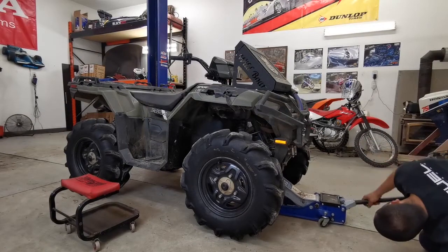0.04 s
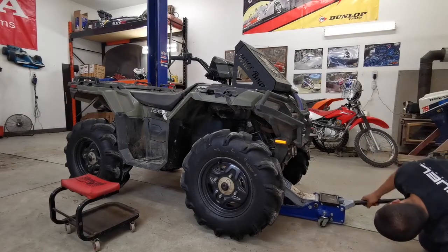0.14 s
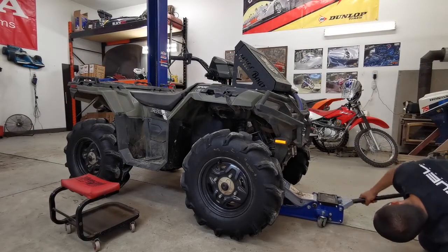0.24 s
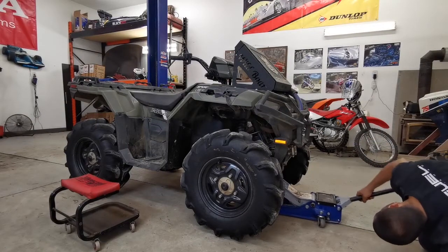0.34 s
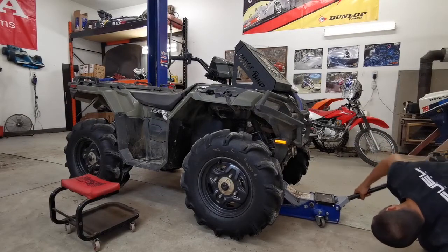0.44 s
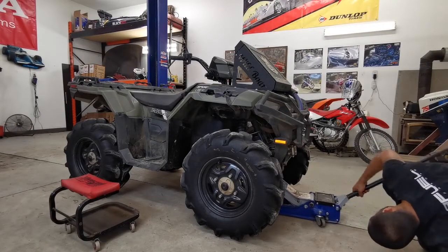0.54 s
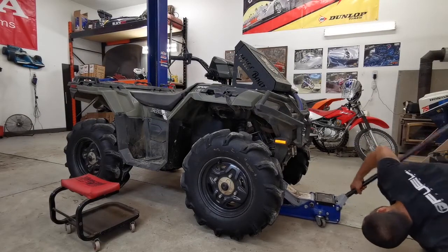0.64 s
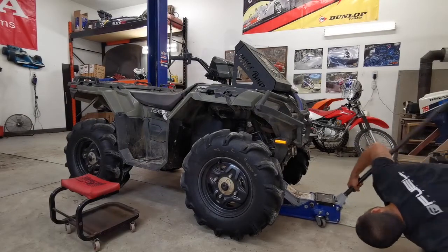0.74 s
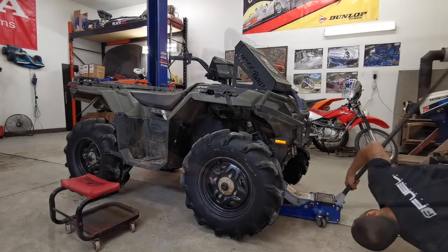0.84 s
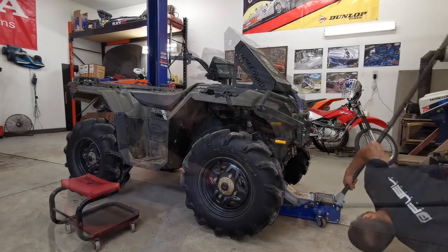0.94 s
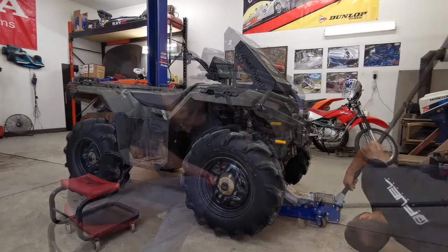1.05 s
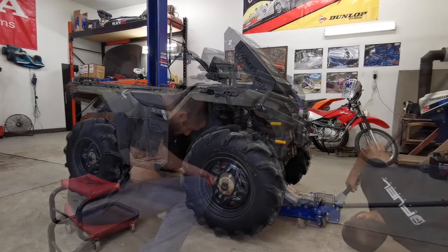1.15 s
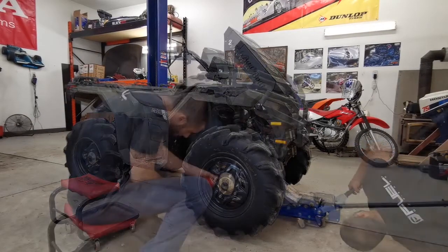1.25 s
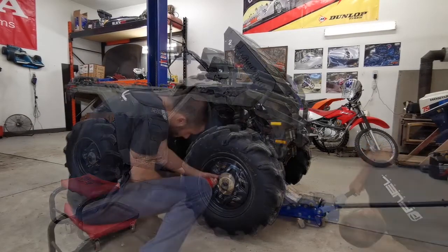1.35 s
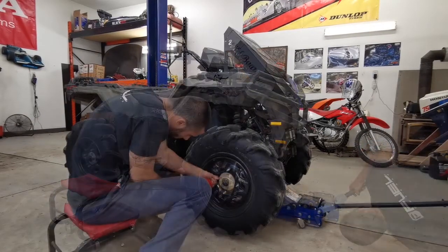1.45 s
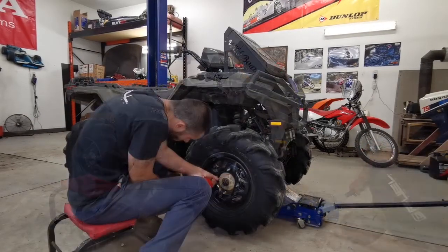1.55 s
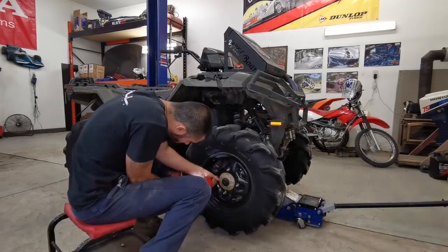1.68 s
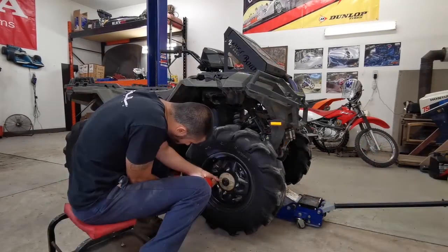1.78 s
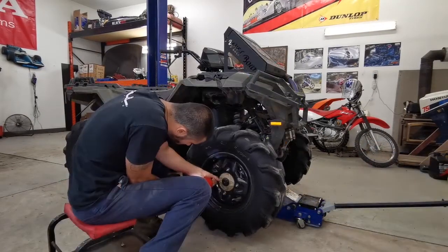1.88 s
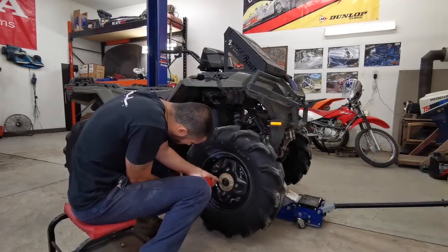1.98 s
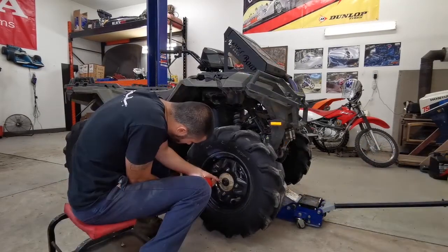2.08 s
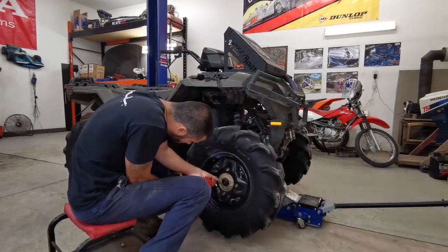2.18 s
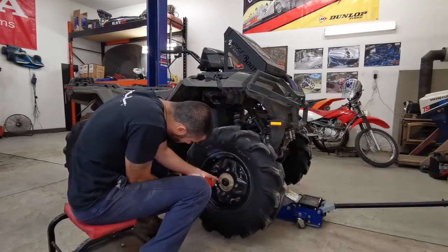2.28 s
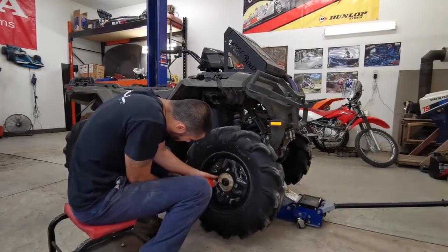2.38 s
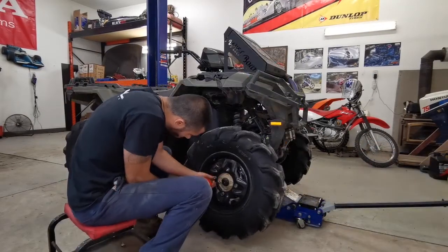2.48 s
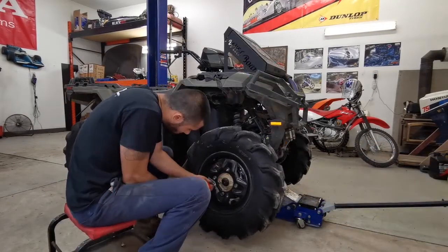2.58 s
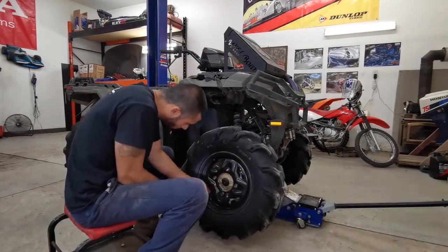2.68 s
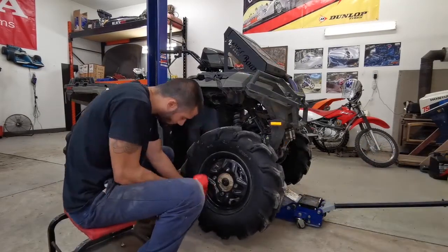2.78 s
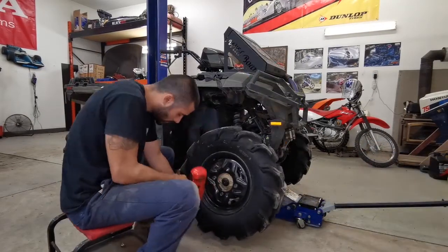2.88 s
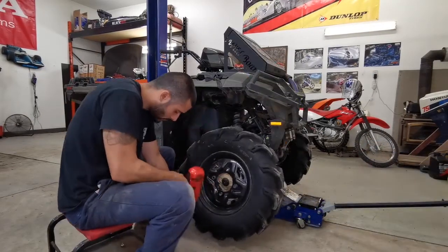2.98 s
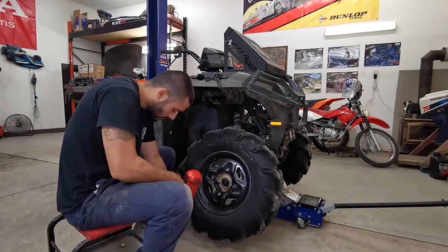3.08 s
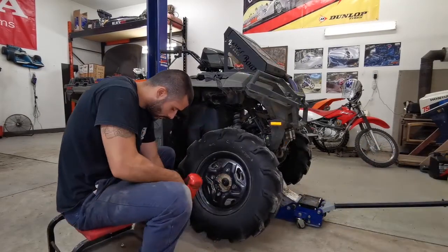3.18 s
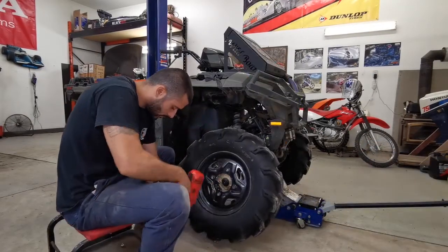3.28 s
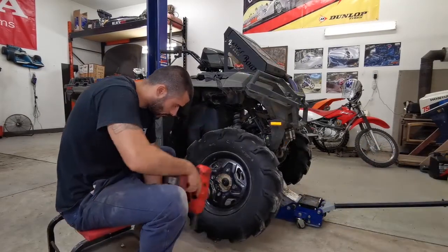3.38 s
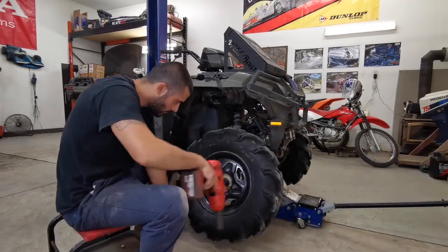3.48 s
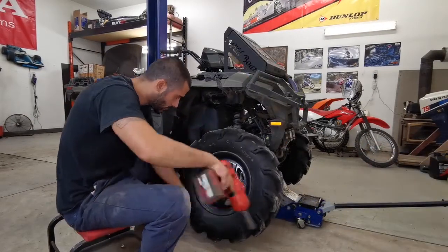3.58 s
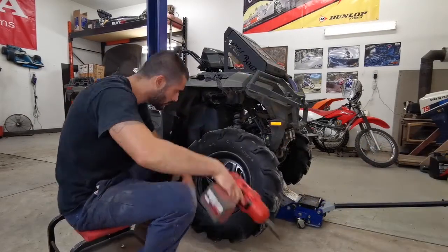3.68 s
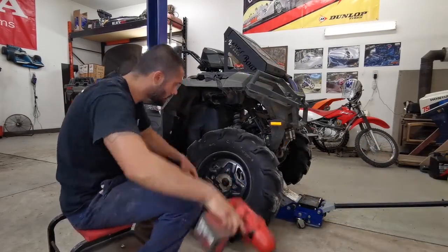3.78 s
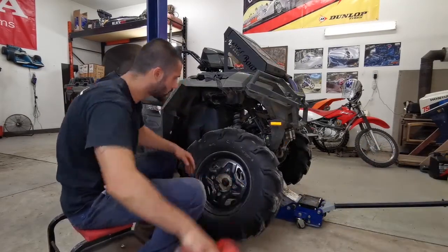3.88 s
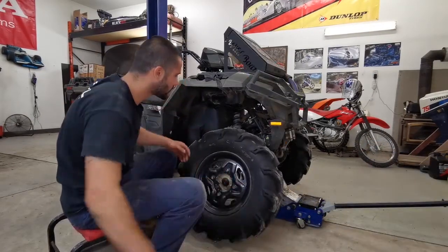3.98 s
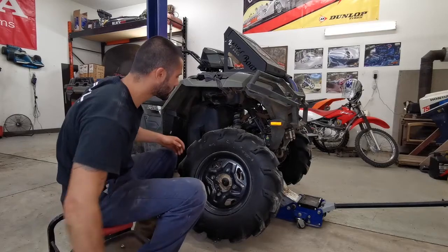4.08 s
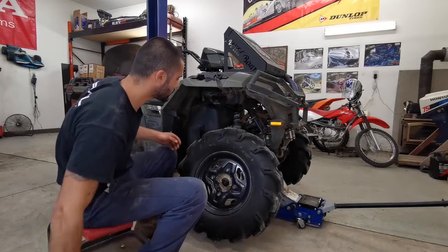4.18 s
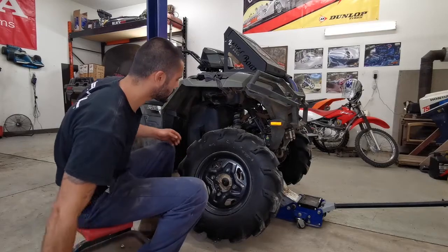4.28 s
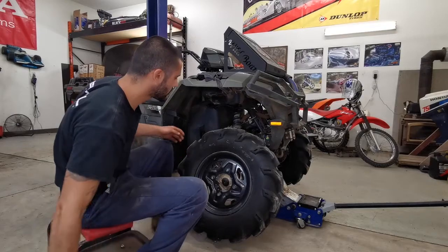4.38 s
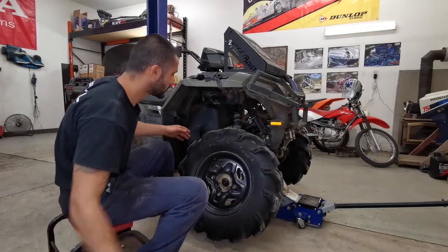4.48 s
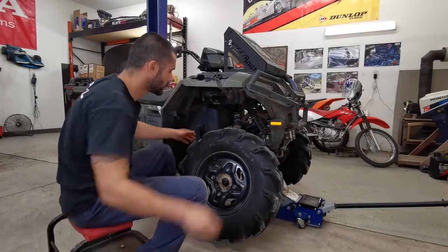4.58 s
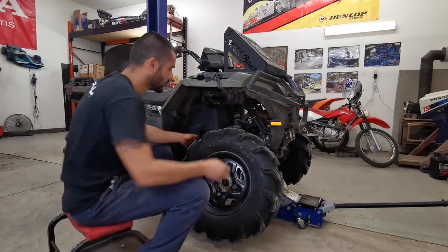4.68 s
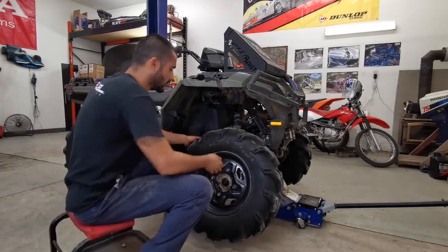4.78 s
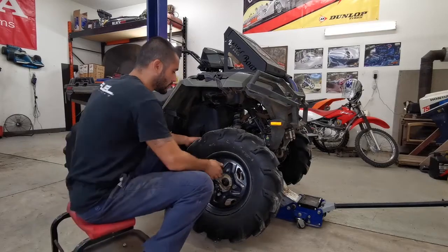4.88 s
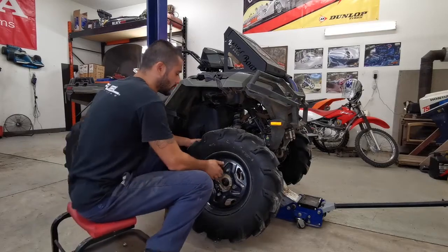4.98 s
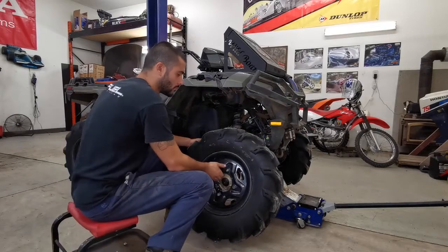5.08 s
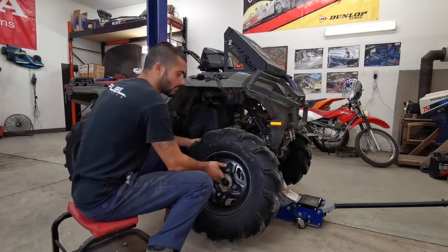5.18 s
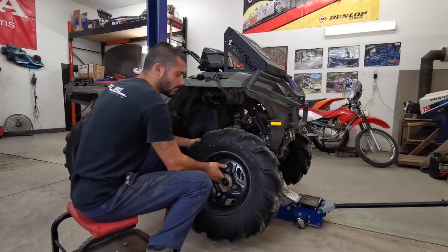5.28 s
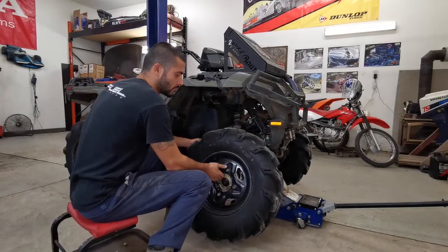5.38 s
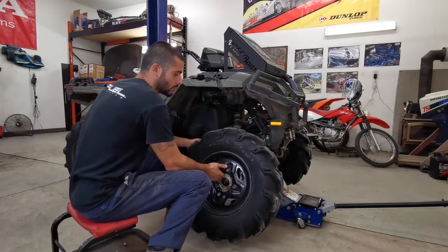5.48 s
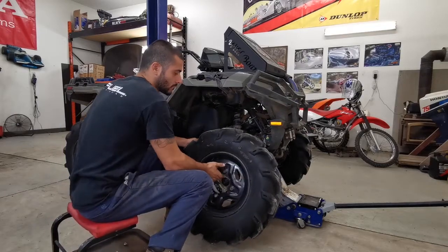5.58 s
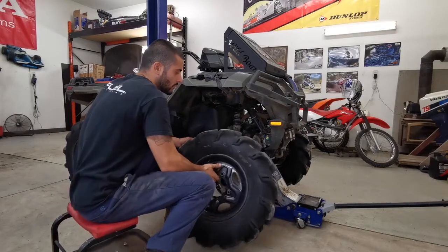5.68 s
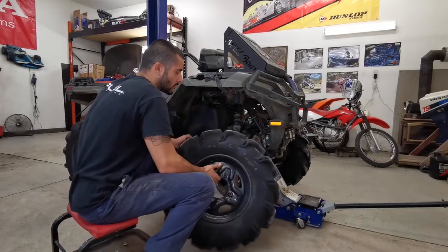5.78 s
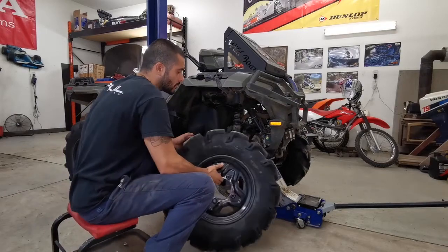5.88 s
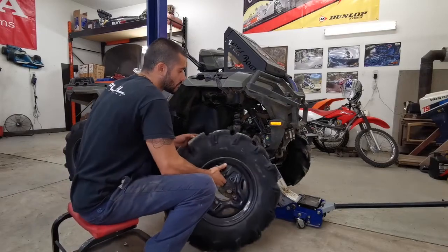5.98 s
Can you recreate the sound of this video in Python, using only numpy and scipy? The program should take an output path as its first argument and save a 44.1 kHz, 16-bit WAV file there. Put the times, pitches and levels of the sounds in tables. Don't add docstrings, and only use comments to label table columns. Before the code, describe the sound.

In an echoing garage, a jack clanks and squeaks, then an impact wrench hammers and whines a nut loose before a wheel thuds off.

```python
import sys
import numpy as np
from scipy import signal
from scipy.io import wavfile
from scipy.ndimage import uniform_filter1d

SR = 44100
rng = np.random.default_rng(int(sys.argv[2]) if len(sys.argv) > 2 else 0)


def put_to_file(sound):
    columns = np.atleast_2d(sound).T
    safe = np.clip(columns, -1, 1)
    whole_steps = np.round(safe * 32767)
    wavfile.write(sys.argv[1], SR, whole_steps.astype(np.int16))


def voltage_ratio(level):
    return 10 ** (np.asarray(level, float) / 20)


N = 266584


def evened(x):
    return x / np.sqrt(np.mean(x ** 2) + 1e-20)


def read(points, hz):
    f, value = np.transpose(points)
    return np.interp(np.log(hz + 1), np.log(f + 1), value)


def coloured(x, points):
    hz = abs(np.fft.fftfreq(4096, 1 / SR))
    level = np.log(voltage_ratio(np.maximum(read(points, hz), -90)))
    taps = np.fft.ifft(np.exp(level - 1j * signal.hilbert(level).imag)).real[:2048]
    return signal.oaconvolve(x, taps / np.linalg.norm(taps))[:len(x)]


def resonate(x, hz, width):
    turn = np.exp(2j * np.pi * np.cumsum(hz * np.ones(len(x))) / SR)
    r = np.exp(-np.pi * width / SR)
    return 2 * (turn * signal.lfilter([1 - r], [1, -r], x / turn)).real


def spread(rows):
    s, *columns = np.transpose(rows)
    t = np.arange(N) / SR
    gate = np.interp(t, [s[0], s[0] + .03, s[-1] - .015, s[-1]], [0, 1, 1, 0])
    return gate, *(np.interp(t, s, c) for c in columns)


def stroke(start, length, first_db, last_db):
    gate, db = spread([(start, first_db), (start + length, last_db)])
    return gate * voltage_ratio(db)


def bumps(rows):
    t = np.arange(N) / SR
    return sum(height * np.exp(-((t - s) / half) ** 2) for s, half, height in rows)


# [f/Hz, correlation]
PORT_LIKENESS = [(60, 0.94), (180, 0.97), (550, 0.55), (1650, 0.018), (4970, 0.035), (15000, 0.018)]


def ports(frames, size):
    hz = np.fft.rfftfreq(size, 1 / SR)
    a, b, c, d = rng.standard_normal((frames, len(hz), 4)).T
    same = np.clip(read(PORT_LIKENESS, hz), -1, 1)[:, None]
    left = a + 1j * b
    right = same * left + np.sqrt(1 - same ** 2) * (c + 1j * d)
    return hz, np.array([left, right])


def heard(x, pan_db, echo_db, send=None, path=0):
    out = np.zeros((5, len(x)))
    lagged = np.roll(x, 14)
    out[:2] = np.array([x, lagged]) * voltage_ratio([[pan_db / 2], [-pan_db / 2]])
    out[2 + path % 3] = (x if send is None else send) * voltage_ratio(echo_db)
    return out


def knocks(rows, colour, ring=(), ring_db=0, blow_db=0, pan_db=-3.5, bright_db=1.1):
    out, t = np.zeros((5, N)), np.arange(SR // 2) / SR
    click = coloured(1. * (t == 0), colour)
    aimed = [(hz, level + bright_db * np.log2(hz / 3000)) for hz, level in colour]
    ringing = [voltage_ratio(ring_db + mode_db - 60 * t / t60) * np.exp(2j * np.pi * hz * t)
               for hz, mode_db, t60 in ring]
    ringing = np.reshape(ringing, (len(ring), len(t)))
    burst_len = SR // 8
    for k, (s, db, echo_db, ms) in enumerate(rows):
        u = t / (ms / 1000)
        bursts = [coloured((n * u * np.exp(-2 * u))[:burst_len], aimed)
                  for n in rng.standard_normal((2, len(t)))]
        shared, own = np.pad(bursts, ((0, 0), (0, len(t) - burst_len)))
        scale = 1 / abs(shared).max()
        phases = np.exp(2j * np.pi * rng.random(len(ring)))
        modes = (phases @ ringing).imag * np.tanh(u)
        send = click * np.linalg.norm(scale * shared) + modes
        sound = heard(scale * shared + modes, pan_db, echo_db, send, path=k)
        sound[0] += .8 * scale * own * voltage_ratio(pan_db / 2)
        part = out[:, round(s * SR):][:, :len(t)]
        part += voltage_ratio(db + blow_db) * sound[:, :part.shape[1]]
    return out


# [f/Hz, density/dB per Hz]
HUM_COLOUR = [(12, -25.5), (20, -9.5), (91, -10.5), (157, -6), (240, -3), (271, -13), (359, -10.5),
              (584, -11.5), (633, -11), (1050, -16), (2500, -21.5), (3250, -40.5), (5500, -120)]
HISS_COLOUR = [(1180, -85), (2000, 0.5), (2720, -1), (3600, -4), (4550, -3), (5100, -6.5), (8330, -17),
               (10700, -14), (11900, -22), (15100, -26.5), (16200, -36)]


def patchy_noise(points, level_db, patchy_db):
    hz, z = ports(N // 512 + 5, 2048)
    patches = uniform_filter1d(rng.standard_normal(z.shape[1:]), 12, 0)
    patches = evened(uniform_filter1d(patches, 8, 1))
    z = z * voltage_ratio(read(points, hz)[:, None] + patchy_db * patches)
    return voltage_ratio(level_db) * evened(signal.istft(z, nperseg=2048, noverlap=1536)[1][:, :N])


def hum():
    return patchy_noise(HUM_COLOUR, -42, patchy_db=1.2) + patchy_noise(HISS_COLOUR, -49.5, patchy_db=.6)


# [f/Hz, level/dB]
DRONE_LINES = [(60, -66.5), (119, -59), (156, -56.5), (235, -85), (315, -53.5), (464, -60.5)]


def drone():
    return sum(voltage_ratio(db) * evened(resonate(rng.standard_normal(N), hz, 11.0)) for hz, db in DRONE_LINES)


LATCH = [
    (0.3185, -17, -10.5, 2.7),
    (.324, -33.5, -15.5, 3.64),
]
LATCH_COLOUR = [(180, -100), (300, -34.5), (452, -11.5), (658, -36.5), (1060, 7), (1270, -14), (1910, 0),
                (2560, -6.5), (4320, 2.5), (7670, -28.5), (8600, -27), (15000, -43.5)]
LATCH_RING = [(465, -3, .22), (960, -5, .1), (1060, -6, .08), (1730, 3, .1), (1900, -2, .15)]


def latch():
    return knocks(LATCH, LATCH_COLOUR, LATCH_RING, ring_db=-19.5, pan_db=8.5)


# [f/Hz, t60/s]
GARAGE_T60 = [(100, 0.58), (250, 0.93), (660, 1.215), (1740, 1.36), (4590, 1.363), (10500, 0.82),
              (13000, 0.95), (16000, 0.9) ]


def garage(x):
    hz, z = ports(2 * SR // 128, 512)
    t = np.arange(z.shape[2]) * 128 / SR
    decay = voltage_ratio(-60 * t / read(GARAGE_T60, hz)[:, None])
    tail = signal.istft(z * decay, nperseg=512, noverlap=384)[1]
    t = np.arange(tail.shape[1]) / SR
    tail = tail * np.clip((t - .003) / .006, 0, 1)
    tail = tail / np.sqrt(np.mean(tail[:, :SR // 10] ** 2)) / 8
    return signal.fftconvolve(x[None], tail, axes=1)[:, :N]


JACK = [
    (.389, -16.5, -6.5, 14.4),
    (.395, -13, -14, 1.2),
    (.408, -18, -28, 5.5),
    (.44, -35, -6, 2.3),
]
JACK_COLOUR = [(120, -27), (200, -47), (300, -39), (467, -5), (650, -10), (950, -5.5), (1460, -4),
               (1780, -3.5), (2450, -2.5), (3300, -10), (4810, -7.5), (7800, -22.5), (10800, -25),
               (15000, -49.5)]
JACK_RING = [(236.5, -14, 1), (472, -0.5, 0.1), (601, -3.5, 0.24), (942, 1, 0.072), (1152, -0.5, 0.12),
             (1461, 1, 0.29), (1826, -0.5, 0.21), (1805, -4, 0.32), (2000, -10, .3), (2363, -7, 0.33),
             (1850, -9, .3), (2503, -10, 0.28), (4254, -10.5, 0.52), (4760, -3, 0.2)]


def jack():
    return knocks(JACK, JACK_COLOUR, JACK_RING, ring_db=-19.5, pan_db=16.0, bright_db=0.0)


# [t/s, length/s, first level/dB, last level/dB, f/Hz]
SQUEAKS = [
    (.69, .2, -36, -42, 2362),
    (.72, .15, -41, -46, 1812),
    (.62, .1, -42, -44, 1437),
    (.6, .08, -39, -42, 1790),
]


def squeak():
    tones = sum(stroke(*row) * evened(resonate(rng.standard_normal(N), hz, 6)) for *row, hz in SQUEAKS)
    return heard(tones, 0.47, -35.5)


FITTING = [
    (1.355, -33.5, -10, 2.6),
    (1.371, -36, -30, 1.7),
    (1.377, -26, -17, 3.3),
    (1.478, -26, -16, 5.5),
    (1.5145, -31, -18, 3.7),
]
FITTING_COLOUR = [(180, -14), (300, -11), (490, -19), (726, -4.5), (801, -13), (943, -8), (1310, -9),
                  (2690, -0.5), (3440, -11), (4390, -9.5), (8320, -27), (10800, -26), (15000, -82)]
RIM_RING = [(710, -3, 0.13), (2590, -0.5, .3), (2700, 2, 0.31)]


def fitting():
    return knocks(FITTING, FITTING_COLOUR, RIM_RING, ring_db=-27.5, blow_db=7.5)


DRAGS = [
    (1.465, 0.27, -40, -51),
    (2.754, 0.14, -40.5, -33.5),
    (3.23, 0.089, -37, -35),
    (4.9, 0.096, -49, -49),
    (5.764, 0.214, -32.5, -48),
]
DRAG_COLOUR = [(29, -55), (50, -42), (100, -8), (222, -4), (367, -18), (455, -34), (479, -25), (651, -22),
               (1200, -55), (1560, -55), (2640, -120)]


def drags():
    lumps = voltage_ratio(2.2 * evened(uniform_filter1d(rng.standard_normal(N), 500)))
    judder = evened(coloured(rng.standard_normal(N) * lumps, DRAG_COLOUR))
    return heard(judder * sum(stroke(*row) for row in DRAGS), 0.055, -61.5)


RIM_KNOCK = [
    (1.478, -30, -30, 6),
    (1.498, -33, -30, 8),
    (1.585, -38, -30, 8),
    (1.52, -36, -30, 6),
]
RIM_KNOCK_COLOUR = [(80, -31), (200, 1), (330, -11.5), (720, -5), (1200, -17.5), (4000, -40.5)]
RIM_KNOCK_RING = [(716, -2.5, 0.26), (207, -1, 0.27)]


def rim_knock():
    return knocks(RIM_KNOCK, RIM_KNOCK_COLOUR, RIM_KNOCK_RING, ring_db=-9.5, blow_db=4.0)


TAP = [
    (1.528, -36, -25, 1),
    (3.6615, -22, -25, 1.5),
    (4.0115, -33, -25, 1.5),
]
TICK = [
    (4.4298, -18.5, -14.5, 1.96),
    (4.4544, -43, -12, 1.7),
    (4.4894, -28, -14.5, 1.5),
]
TICK_COLOUR = [(290, -22.5), (500, -11), (678, 9.5), (855, 8), (1300, 6.5), (2690, 8.5), (3020, -2),
               (3390, 8), (7980, -9.5), (10700, -7), (16000, -25)]


def taps_and_ticks():
    return knocks(TAP, TICK_COLOUR) + knocks(TICK, TICK_COLOUR)


TRIGGER = [
    (1.772, -35.5, 6.5, 10),
    (1.7828, -15, -27, 1.6),
    (1.795, -30, 5, 13),
    (1.833, -13, -43, 1.6),
]
TRIGGER_COLOUR = [(290, -42.5), (500, -23), (1000, -1), (1350, 0), (1750, 1), (2500, 1), (3090, -12),
                  (4050, -1), (4470, -7), (9790, -10.5), (15000, -45)]


def trigger():
    return knocks(TRIGGER, TRIGGER_COLOUR, bright_db=-8.5)


HAMMER = [
    -6.5,
    -2.5,
    -4,
    -3,
    -7,
    -4,
]
HAMMER_COLOUR = [(200, -12.5), (500, -15), (795, -8.5), (893, -36), (988, -7), (1280, -34), (1400, -15),
                 (1840, -5), (2730, 2.5), (3110, -0.5), (4600, 8.5), (6300, -3.5), (8210, -7.5), (10700, 1),
                 (12300, -9.5), (14200, -15), (16000, -22.5)]
ANVIL_RING = [(2370, -10.5, 0.5), (2790, -16, 0.5), (3240, -32.5, 0.63), (3540, 7, 0.14), (3950, -24, 0.61),
              (3980, -11.5, 1.7), (4823, -31.5, 10), (6800, -15, 4.3), (6860, -42, 5.0), (8900, -18, 2.8),
              (10170, -8, 1.2), (11200, 17, .03), (10500, 17, .025), (4600, 18, .03), (5900, 14, .02) ]


def hammer():
    first_s, blows_per_s, blow_ms, echo_db = 1.8106, 34.0, 2.3, -24.5
    rebound_s, rebound_db = .0085, -13
    rows = [(first_s + k / blows_per_s, db, echo_db - db, blow_ms) for k, db in enumerate(HAMMER)]
    rows += [(s + rebound_s, db + rebound_db, echo, ms) for s, db, echo, ms in rows]
    return knocks(rows, HAMMER_COLOUR, ANVIL_RING, ring_db=-31.5, blow_db=9.5, pan_db=0.0, bright_db=2.6)


# [t/s, gear mesh f/Hz, drive level/dB]
WHIRR = [
    (1.97, 2564, -32),
    (2.2, 2582, -29),
    (2.255, 2648, -25),
    (2.38, 2640, -22.5),
    (2.52, 2665, -24),
    (2.6, 2698, -23),
    (2.7, 2640, -29),
    (2.8, 2656, -37.5),
    (2.91, 2627, -39),
]
# [multiple, level/dB]
MESH = [(1.5, 4), (2, 11), (2.5, -5), (3, 13), (4, 3), (3.96, -1)]
# [f/Hz, density/dB per Hz]
RUSH_COLOUR = [(290, -23), (500, -20), (1070, -10.5), (1440, -3), (1700, -10.5), (2360, -7), (2710, 0.5),
               (3080, -12), (5260, -3.5), (5720, -12.5), (6680, -6), (8490, -16), (10800, -13.5),
               (12000, -24), (13700, -24), (15500, -28)]
# [middle t/s, half length/s, level/dB]
LEANS = [
    (2.199, 0.027, -41),
    (2.284, 0.019, -48),
    (2.363, 0.051, -39.5),
    (2.523, 0.038, -41.5),
    (2.605, 0.036, -37),
    (2.776, 0.037, -46),
]
# [middle t/s, half length/s, level/dB]
SLACK = [(2.29, .008, -4), (2.345, .008, -5), (2.374, .01, 3), (2.395, .007, -5), (2.43, .015, 2),
         (2.453, .009, -8), (2.541, .009, -13), (2.613, .012, -12), (2.638, .012, 3), (2.683, .012, -12),
         (2.703, .008, 4), (2.716, .004, -5), (2.729, .008, 5), (2.77, .02, -10), (2.803, .007, 4),
         (2.83, .014, -12)]


def whirr():
    gate, hz, drive_db = spread(WHIRR)
    t = np.arange(N) / SR
    let_go_s, engage_s = 2.642, 2.25
    coasting = np.clip((t - let_go_s) / 0.0061, 0, 1)
    throb_db = bumps(SLACK) - 9 * np.clip((engage_s - t) / 0.043, 0, 1)
    wander, swell, chatter = evened(uniform_filter1d(rng.standard_normal((3, N)), 600))
    turns = np.cumsum(hz + 2.5 * wander) / SR
    mesh = np.sin(2 * np.pi * turns) * voltage_ratio(drive_db + throb_db + 6.5 + .8 * swell)
    loose_turns = turns + .025 * chatter
    overtones = sum(voltage_ratio(db) * np.sin(2 * np.pi * k * loose_turns) for k, db in MESH)
    thinning_db = -22 * abs(t - let_go_s + .06)
    mesh += overtones * voltage_ratio(drive_db - 9 + thinning_db + .4 * throb_db + 2 * chatter)
    anvil_tail = voltage_ratio(-28 - 20 * abs(t - WHIRR[0][0]))
    air = voltage_ratio(drive_db + 1 - 5.5 * coasting)
    rush = np.hypot(air, anvil_tail) * coloured(rng.standard_normal(N), RUSH_COLOUR)
    leaning = bumps([(s, half, voltage_ratio(db)) for s, half, db in LEANS])
    housing = voltage_ratio(14) * leaning * evened(resonate(rng.standard_normal(N), 1449, 23))
    whine = heard(gate * mesh, -3, -36)
    return whine + heard(gate * rush, -0.67, -23.5, path=1) + heard(gate * housing, -2.5, -34)


NUT_FREE = [
    (2.605, -16, -15, 2.9),
    (2.613, -16, -19, 2.5),
    (2.623, -17, -20, 3),
]
NUT_FREE_COLOUR = [(240, -37), (400, 0), (928, 9), (1450, 3), (2190, 8), (2590, 5), (3570, 9), (5390, -14),
                   (7000, -9), (8800, -17), (10900, -18), (15500, -40)]


def nut_free():
    return knocks(NUT_FREE, NUT_FREE_COLOUR)


SLIP = [
    (2.879, -16, -46, 4),
    (3.313, -14, -24, 5.5),
    (3.326, -12.5, -33, 2.7),
    (3.3385, -16, -39, 4.8),
    (3.407, -29, -16, 3.6),
]
SLIP_COLOUR = [(60, -16), (150, -8), (600, -2), (1400, -3), (2000, -10), (4500, -20), (7000, -21),
               (15000, -41)]


def slip():
    return knocks(SLIP, SLIP_COLOUR)


SOCKET = [
    (2.9066, -6, -16, 1.2),
    (2.915, -17, -27, 0.6),
]
SOCKET_COLOUR = [(240, -22), (400, -38), (650, -26), (1180, -5.5), (1720, -13.5), (2380, 1), (2910, -7.5),
                 (6040, -3), (7800, -7.5), (9200, -5), (10600, -0.5), (12300, -15), (15500, -13),
                 (16300, -16)]


def socket_click():
    return knocks(SOCKET, SOCKET_COLOUR, pan_db=-12.0)


GRIP = [
    (2.97, -29.5, 2, 1.8),
    (3.407, -21, -14, 4.9),
]
GRIP_COLOUR = [(59, -15), (100, -30), (1350, -4.5), (1590, -10), (1950, 3), (2660, 1.5), (3030, -1),
               (4970, -3.5), (8000, -12), (10400, -6), (17600, -120)]


def grip():
    return knocks(GRIP, GRIP_COLOUR, bright_db=-4.5)


DETENT = [
    (3.3386, -10.5, -10.5, 1.1),
    (3.3411, -15, -9.5, 1.0),
]
DETENT_COLOUR = [(240, -2), (400, -1), (529, -16), (589, -8), (779, -8), (968, -2), (2310, -3.5), (3510, 0),
                 (5860, -3.5), (6730, 1.5), (7990, -10), (10600, 2), (12500, -8.5), (15000, -10.5),
                 (16300, -7)]


def detent():
    return knocks(DETENT, DETENT_COLOUR, pan_db=-22)


SET_DOWN = [
    (3.6605, -13, -13, 3.9),
    (3.679, -14.5, -16, 1.6),
    (3.778, -27, -17, 3),
    (3.835, -25, -6.5, 1.6),
    (4.011, -25, -13, 3.4),
    (4.052, -34, -2, 2),
]
SET_DOWN_COLOUR = [(88, -41), (150, -15), (409, -0.5), (525, 5), (578, -4), (728, 1), (1980, -17.5),
                   (2450, -12), (3030, -22.5), (4370, -19), (8100, -38.5), (10800, -63), (15000, -61)]


def set_down():
    return knocks(SET_DOWN, SET_DOWN_COLOUR, pan_db=8.5)


NUT = [
    (4.7725, -11.5, -14, 1.96),
    (4.7765, -12, -16.5, 3.8),
    (4.7955, -19, -16.5, 2.6),
]
NUT_COLOUR = [(120, -17), (200, -26), (340, -9), (432, -11), (509, -13), (623, -11), (1320, -15.5),
              (1710, -7), (2800, -2), (3310, -8.5), (8420, -20), (10900, -21), (14900, -31), (16000, -43)]
NUT_RING = [(407.6, -5.5, 0.14), (2816, -5, 0.1), (2560, 0.5, 0.065), (2330, -10, 0.15), (3650, -7, 0.15)]


def nut():
    return knocks(NUT, NUT_COLOUR, NUT_RING, ring_db=-18.5, pan_db=0.5)


TYRE = [
    (5.773, -26, -17.5, 4.5),
    (5.789, -32, -16, 3.1),
]
TYRE_COLOUR = [(180, -51), (300, -3), (422, -4), (897, -1.5), (1500, -27), (1630, -15), (2880, -18),
               (5020, -40), (6680, -17), (9000, -54), (11700, -74), (19800, -120)]
TYRE_RING = [(222, 1, .35), (890, -6, .1), (6700, -24, .05)]


def tyre():
    return knocks(TYRE, TYRE_COLOUR, TYRE_RING, ring_db=-8.0)


WHEEL = [
    (5.8795, -8.5, -11.5, 3.8),
    (5.896, -20, -3, 5.2),
]
WHEEL_COLOUR = [(35, -54), (60, -5), (187, -0.5), (359, -4), (403, -8.5), (889, -8), (1520, -15.5),
                (2470, -12), (3670, -20.5), (6410, -18.5), (7720, -29), (10700, -25.5), (15500, -50)]
WHEEL_RING = [(162.4, -8, 0.26), (284, -6, 0.23), (675, 3, 0.082), (876, -3.5, 0.28)]


def wheel():
    return knocks(WHEEL, WHEEL_COLOUR, WHEEL_RING, ring_db=-17.5)


def scene():
    near = latch() + jack() + squeak()
    near += fitting() + drags() + rim_knock() + taps_and_ticks()
    near += trigger() + hammer() + whirr() + nut_free()
    near += slip() + socket_click() + grip() + detent()
    near += set_down() + nut() + tyre() + wheel()
    room = hum() + drone()
    return near[:2] + sum(garage(path) for path in near[2:]) + room


def ducked(x, knee_db, share, fall_s, recover_db_per_s):
    power_db = 10 * np.log10(abs(uniform_filter1d((x ** 2).mean(0), size=600)) + 1e-12)
    creep = np.arange(N) * recover_db_per_s / SR
    held_db = np.maximum.accumulate(power_db + creep) - creep
    over_db = np.maximum(held_db - knee_db, 0)
    r = np.exp(-1 / (fall_s * SR))
    return x / voltage_ratio(share * signal.lfilter([1 - r], [1, -r], over_db))


def band_limit(x):
    return signal.sosfilt(signal.butter(12, 17160, fs=SR, output="sos"), x)


# [knee level/dB, share of the excess taken off, fall/s, recovery/dB per s]
DUCKING = [
    (-23, 0.15, 0.097, 37),
    (-19.5, 0.22, 0.057, 39.5),
]
# [t/s, level/dB]
FADE = [
    (0.718, -5.5),
    (1.05, -15.5),
    (1.25, -19.5),
    (1.42, -13),
    (1.6, -7.5),
]
# [f/Hz, level/dB]
PORT_TILT = [(60, 0.5), (99, -0.5), (160, -2), (270, -2.5), (450, -5), (740, -7), (1220, -4), (2010, -8.5),
             (3330, -4.5), (5500, 3.5), (8000, 4.5), (10700, -13.5), (12500, -6), (15000, 0)]
# [f/Hz, level/dB]
TOP_LIFT = [(11500, 0.5), (13000, -1), (14800, 3), (15500, 6)]
# [from t/s, to t/s, edge f/Hz]
CLOSED_TOP = [
    (1.815, 1.835, 13000),
    (2.045, 2.575, 14500),
    (2.084, 2.575, 13500),
    (2.56, 2.895, 15100),
    (2.78, 2.89, 14200),
]


def record(dry):
    slow, quick = DUCKING
    s, db = np.transpose(FADE)
    fade = voltage_ratio(np.interp(np.arange(N) / SR, s, db))
    mix = ducked(ducked(dry, *slow), *quick) * fade
    hz, t, z = signal.stft(mix, SR, nperseg=1024)
    z = z * voltage_ratio(np.outer([.5, -.5], read(PORT_TILT, hz)))[..., None]
    z = z * voltage_ratio(-34 * (hz > 15800))[:, None]
    for start, end, edge_hz in CLOSED_TOP:
        z = z * (1 - np.outer(hz > edge_hz, (t > start) & (t < end)))
    dropped = rng.random((len(hz) // 6 + 1, len(t) // 4 + 1)) < .2
    holes = np.kron(dropped, np.ones((6, 4)))[:len(hz), :len(t)]
    z = z * (1 - holes * (hz > 11800)[:, None])
    z = z * voltage_ratio(read(TOP_LIFT, hz))[:, None]
    mix = np.clip(signal.istft(z, SR, nperseg=1024)[1][:, :N], -1, 1)
    return band_limit(mix)


dry = scene()
out = record(dry)
put_to_file(out)
```